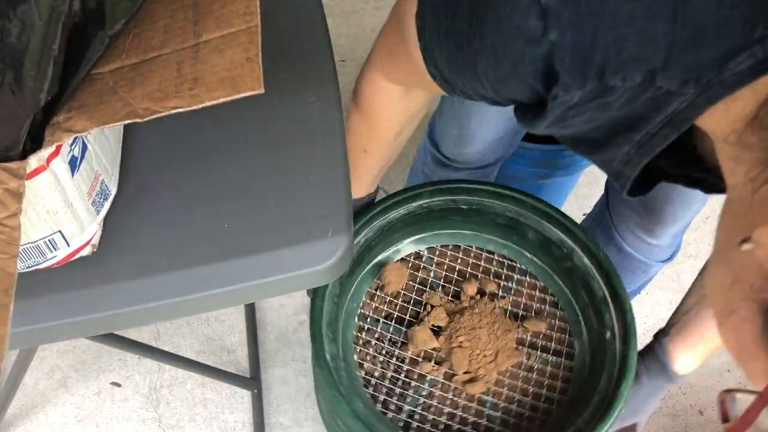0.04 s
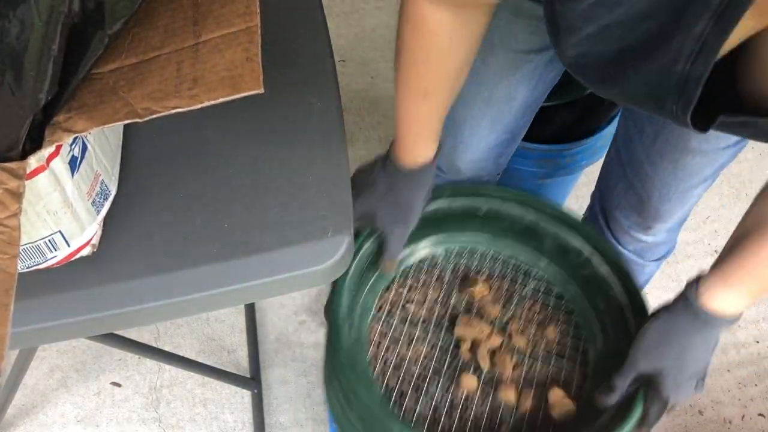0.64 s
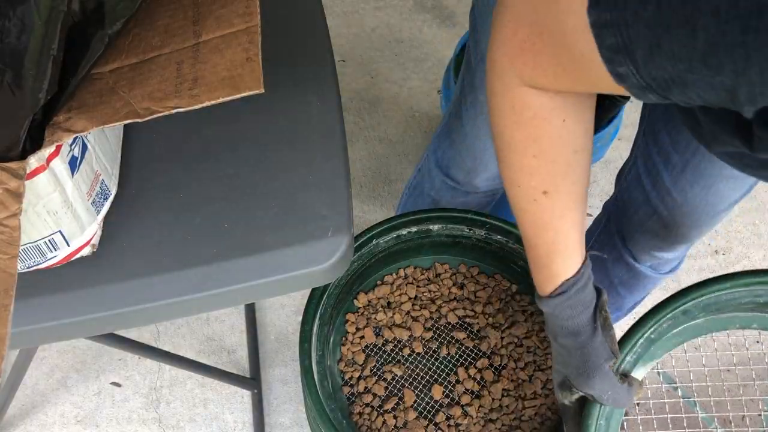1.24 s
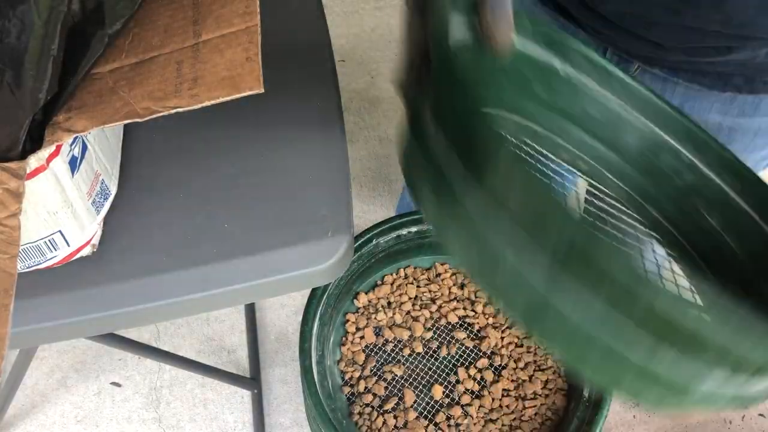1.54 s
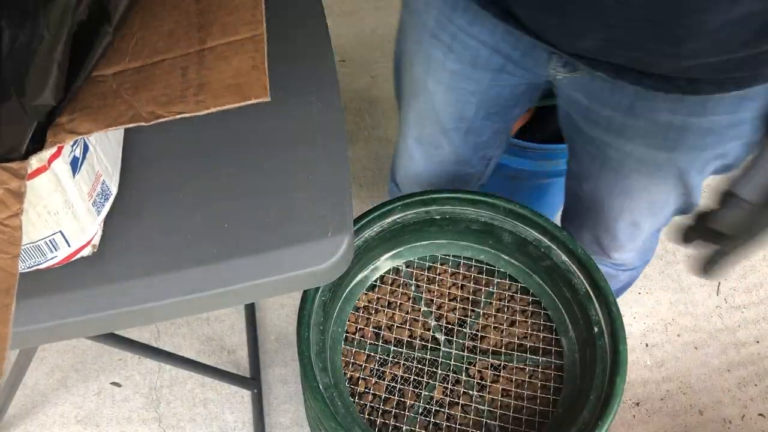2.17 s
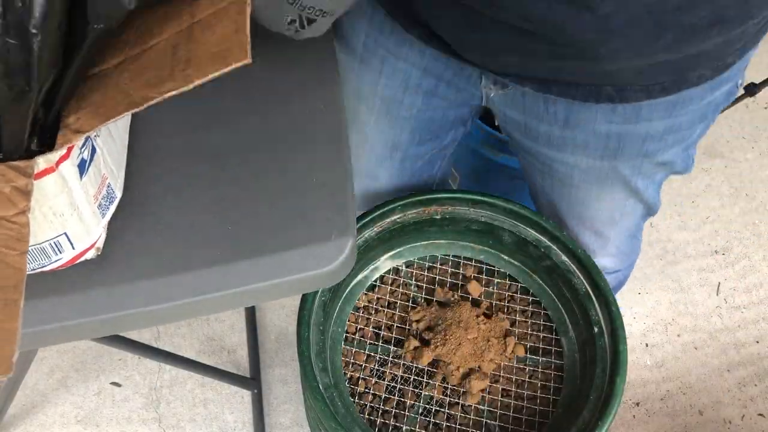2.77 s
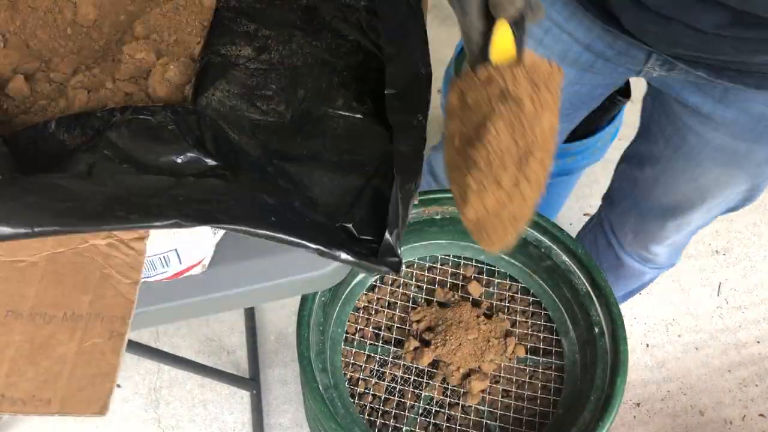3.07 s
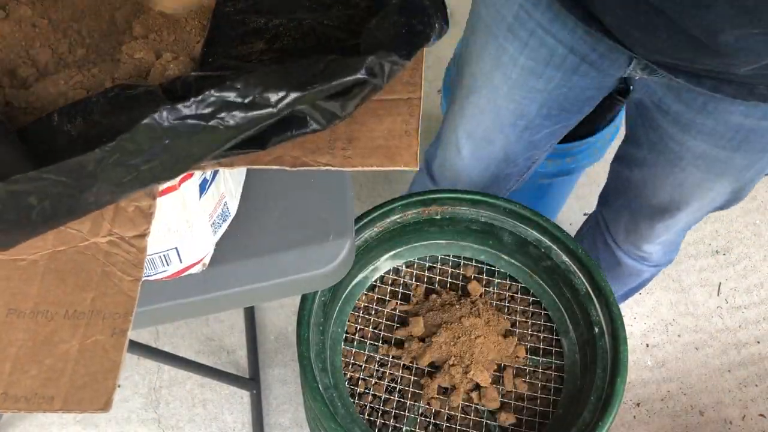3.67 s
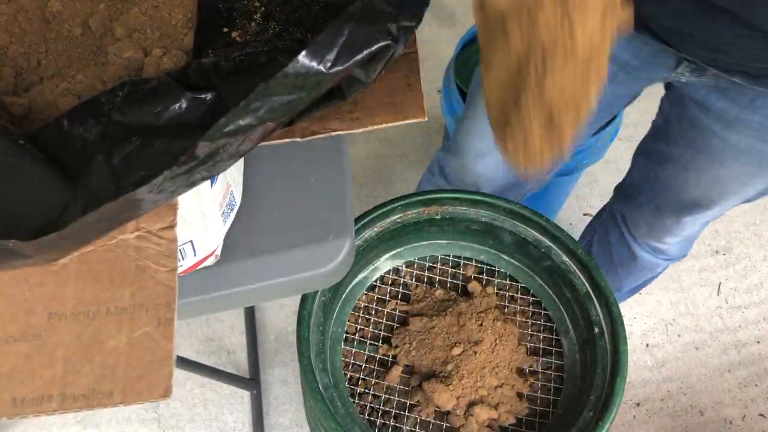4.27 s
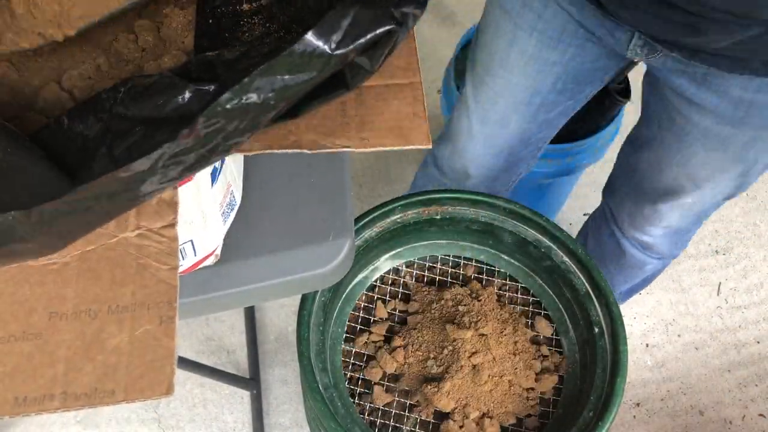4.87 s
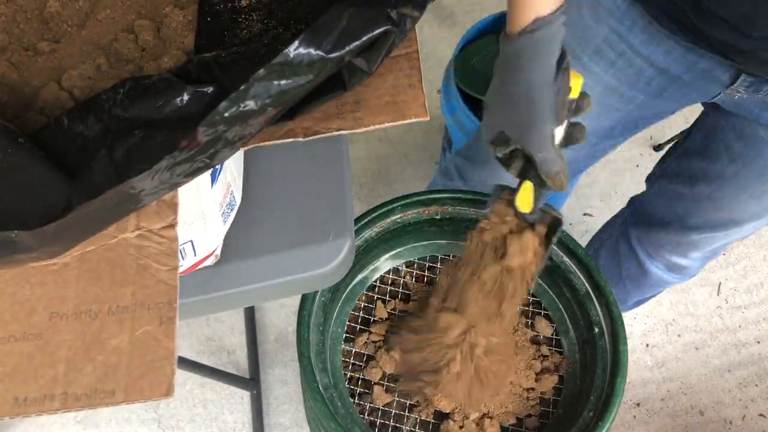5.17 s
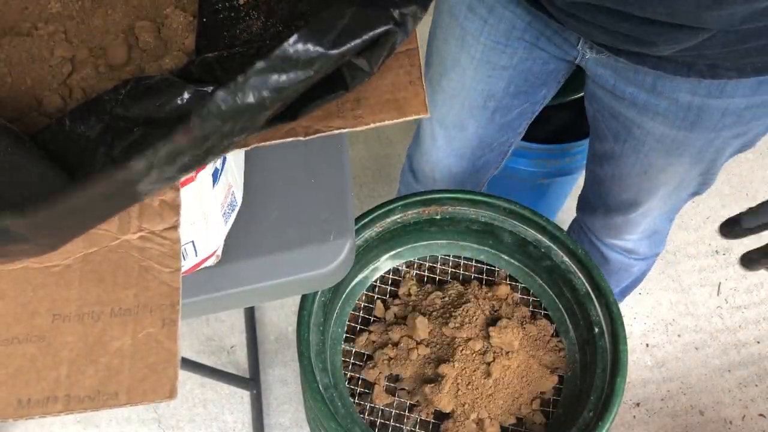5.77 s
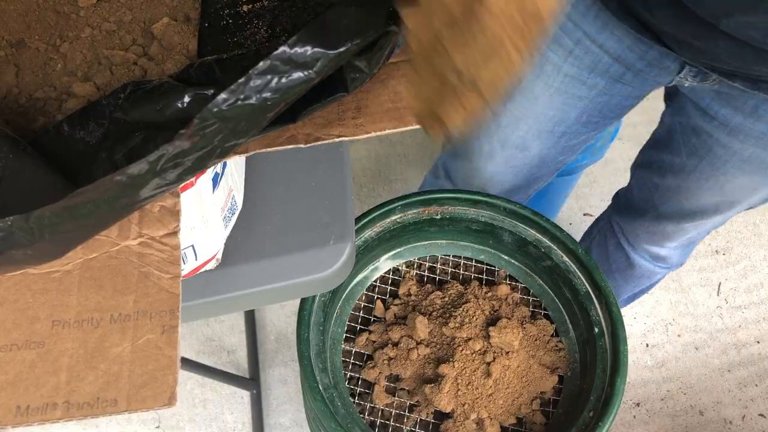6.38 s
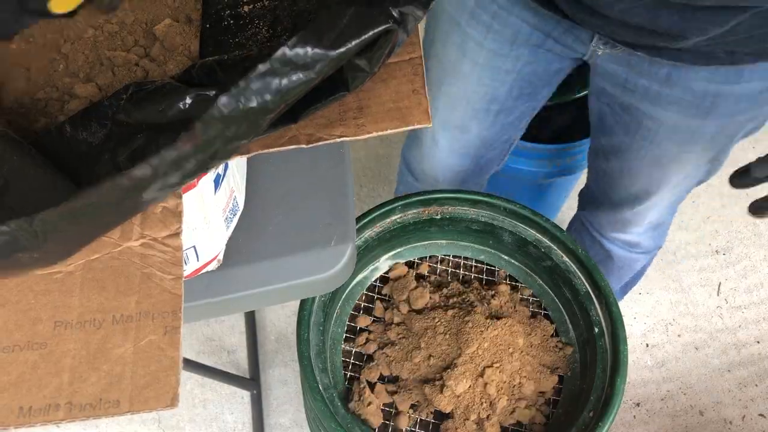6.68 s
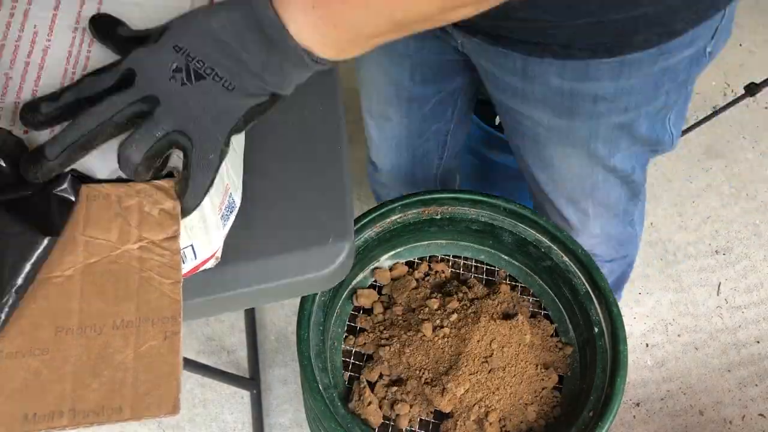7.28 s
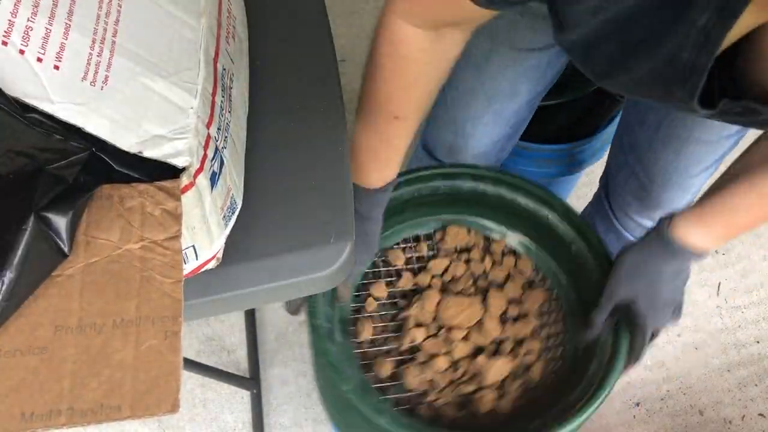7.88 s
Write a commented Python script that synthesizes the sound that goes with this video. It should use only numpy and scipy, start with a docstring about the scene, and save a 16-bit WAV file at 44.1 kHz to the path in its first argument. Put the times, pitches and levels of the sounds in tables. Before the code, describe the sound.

A few knocks on a plastic sieve lead into a short, quick burst of gravel clatter and sandy hiss. Then come scattered, softer sounds: crumbly scoops of soil, rustles of a plastic bag, brief pours and stones ticking on a trowel. Finally the sieve is shaken hard again. The microphone is just above the pan, outdoors, with a very faint machine hum behind.

```python
"""Sifting gravel in a pan

Dry gravel and dirt are shaken fast in a plastic pan with a wire-mesh floor, heard from close by.
Clods strike the wall and excite its resonances, while countless small impacts of sand on the mesh
merge into a hiss. Pans are swapped with a few knocks, dirt is scooped from a rustling plastic bag
and poured in, and the shaking starts again, over a faint hum."""
import sys
import numpy as np
from scipy import signal
from scipy.fft import rfft, irfft
from scipy.io import wavfile
from scipy.ndimage import uniform_filter1d

SR = 44100
rng = np.random.default_rng(int(sys.argv[2]) if len(sys.argv) > 2 else 0)


def to_wav(s):
    """Save 16-bit WAV."""
    ch = np.atleast_2d(s).T  # columns
    pcm = np.round(np.clip(ch, -1, 1) * 32767)  # PCM
    wavfile.write(sys.argv[1], SR, pcm.astype(np.int16))


N = 358091
TIME = np.arange(N) / SR

# Levels in the tables are relative; each source applies its own gain.
# impacts of the load on the pan wall: t/s, clatter level/dB, thud level/dB
SLAMS = [(0.2484, -52, -51.5), (0.277, -40.5, -47), (0.3221, -39.5, -42.5), (0.341, -53, -47),
         (0.3556, -31.5, -41), (0.378, -52, -39.5), (0.3938, -34, -60), (0.4149, -35, -38),
         (0.4296, -38, -43), (0.4522, -35, -39), (0.466, -29.5, -39.5), (0.489, -51, -66),
         (0.5053, -36.5, -43), (0.5312, -43, -52), (0.548, -40, -46.5), (0.614, -39, -39.5),
         (0.6238, -29.5, -41), (0.635, -38, -58), (0.655, -42, -54), (0.6657, -35, -40), (0.701, -46, -44),
         (0.7154, -37, -40.5), (0.745, -44, -47), (0.765, -40.5, -46), (7.484, -31, -47.5),
         (7.505, -32, -43.5), (7.523, -42, -46.5), (7.5449, -37.5, -51), (7.563, -31, -47),
         (7.588, -38, -47), (7.632, -31.5, -51), (7.655, -31.5, -44.5), (7.6739, -31, -58),
         (7.7197, -29, -49), (7.7426, -32.5, -42), (7.762, -44, -50), (7.787, -35.5, -40),
         (7.8055, -32, -46.5), (7.8716, -34.5, -49), (7.9406, -33.5, -55), (7.958, -38, -42.5),
         (7.9964, -31, -47), (8.044, -38, -50), (8.064, -35, -52), (8.084, -35, -44), (8.1046, -33.5, -48)]
# flow of sand through the mesh, one curve for each bout of shaking: t/s, level/dB
SAND_BOUTS = [
    [(0.285, -65), (0.305, -44), (0.55, -41.5), (0.59, -49), (0.62, -40), (0.78, -43.5), (0.845, -73)],
    [(7.46, -50), (7.485, -50.5), (7.65, -44), (7.81, -44), (7.835, -62), (7.875, -45), (7.93, -52),
     (8.0, -48.5), (8.05, -38.5), (8.12, -40.5)],
]
# knocks on the pan, whose pitch depends on grip and load: t/s, level/dB, f/Hz, T60/s
KNOCKS = [(0.0958, -38, 1365, 0.012), (0.108, -36, 1410, 0.033), (0.1258, -29, 1330, 0.02),
          (0.1356, -29, 1337, 0.032), (0.1538, -30.5, 1250, 0.0095), (0.2091, -29.5, 1220, 0.012),
          (0.2147, -29.5, 1460, 0.0022), (1.032, -32, 1653, 0.023), (1.0391, -30.5, 1693, 0.018),
          (1.063, -34.5, 1707, 0.061), (2.762, -47.5, 1490, 0.03), (2.914, -40, 1600, 0.0093),
          (3.334, -44, 1444, 0.028), (4.004, -42, 1552, 0.05), (5.7103, -31.5, 1204, 0.0073),
          (5.753, -43.5, 1520, 0.024), (6.697, -36.5, 1598, 0.037)]
# soil is shifted, dug or scooped: t/s, duration/s, crumb level/dB, grit level/dB
SCOOPS = [(0, 0.032, -39.5, -44), (0.042, 0.034, -44.5, -46), (0.1, 0.04, -46, -40.5),
          (0.2, 0.012, -30, -33.5), (0.977, 0.046, -56, -48), (1.029, 0.007, -44.5, -32),
          (1.653, 0.035, -57.5, -62), (1.837, 0.027, -51, -48), (1.891, 0.037, -49.5, -51.5),
          (1.942, 0.088, -50, -53.5), (2.529, 0.079, -51.5, -50), (2.692, 0.13, -58.5, -57),
          (2.832, 0.14, -53.5, -47.5), (3.3, 0.081, -50, -52), (3.429, 0.033, -49.5, -58),
          (3.741, 0.035, -59, -56.5), (3.959, 0.072, -45, -49), (4.582, 0.054, -48, -52.5),
          (5.387, 0.0076, -53, -53), (5.451, 0.022, -55, -53), (5.523, 0.048, -56.5, -56.5),
          (5.621, 0.025, -42.5, -53.5), (5.656, 0.014, -48, -47.5), (5.738, 0.031, -53, -52),
          (5.792, 0.071, -50, -54.5), (5.888, 0.031, -58, -51), (5.947, 0.031, -50.5, -46.5),
          (6.004, 0.094, -53.5, -53.5), (6.671, 0.052, -52.5, -50.5), (6.752, 0.011, -46, -44),
          (6.768, 0.089, -68, -60), (7.246, 0.059, -46, -49.5)]
# the bag slides or fine dirt pours: t/s, rise time/s, level/dB
SWISHES = [(0.866, 0.013, -46.5), (1.4, 0.027, -57.5), (1.543, 0.012, -63), (1.774, 0.045, -51.5),
           (2.328, 0.042, -52.5), (2.381, 0.027, -40.5), (2.416, 0.028, -47), (3.091, 0.021, -59.5),
           (3.17, 0.048, -49), (3.793, 0.075, -47.5), (4.354, 0.037, -51), (4.537, 0.044, -51),
           (5.195, 0.079, -59.5), (6.151, 0.016, -49.5), (6.477, 0.09, -52), (7.06, 0.07, -55.5)]
# single stones strike the trowel or each other: t/s, level/dB, f/Hz
CLINKS = [(0.879, -57, 3600), (2.5444, -52.5, 3060), (2.598, -48.5, 2250), (2.764, -45.5, 2170),
          (2.928, -48, 1800), (3.376, -47.5, 2350), (3.753, -52.5, 2280), (3.954, -48.5, 2400),
          (4.3826, -57.5, 4160), (5.392, -48, 2480), (5.4545, -51.5, 2380), (5.493, -53, 3630),
          (5.893, -44, 2360), (5.95, -47.5, 3400), (5.9565, -44, 2340), (6.041, -46, 1820),
          (6.56, -59, 3940), (6.699, -48, 2600), (6.745, -48, 2410)]
# bag creases snap and single grains land: t/s, level/dB
TICKS = [(0.994, -52.5), (1.059, -48), (1.0866, -46), (2.356, -52.5), (2.395, -47), (3.198, -54),
         (3.221, -49), (3.9545, -55), (4.6223, -43.5)]

# modes of the knocked pan: ratio to its pitch, level/dB
PAN_MODES = [(1, 3.5), (.86, -12), (1.17, -9), (1.62, -35), (1.92, -19)]
# resonances of the loaded pan and of the heap on the mesh: f/Hz, bandwidth/Hz, lift/dB
PAN_RESONANCES = [(1223, 510, 9.5), (1710, 150, 10), (1993, 43, 9.5), (2980, 180, 3.5), (3680, 73, 2.5)]
HEAP_RESONANCES = [(1430, 290, 6.5), (2294, 140, 7.5), (3040, 720, 5)]
# spectral envelopes: f/Hz, level/dB
CLATTER_SPECTRUM = [(130, -64.5), (450, -15.5), (800, -1.5), (1400, -2.5), (2100, -1), (3200, -1.5),
                    (9000, -13), (16000, -26)]  # clods on the wall
THUD_SPECTRUM = [(60, -51.5), (200, -32), (290, -21.5), (400, 2), (600, 11), (850, 10.5), (1400, -18)]  # the weight of the load
SAND_SPECTRUM = [(100, -74), (250, -26), (420, 6.5), (800, 5), (4500, 2), (8000, 5.5), (12000, 7),
                 (16000, 2.5)]  # sand on the wires
CRUMB_SPECTRUM = [(50, -70), (280, -28), (450, -15), (1100, -8.5), (1600, -1.5), (4000, -5.5),
                  (6000, -18.5), (12000, -18.5)]  # coarse soil
CRACKLE_SPECTRUM = [(100, -55.5), (500, -34), (2000, -25), (3600, -1), (6500, 2), (12000, 2), (16000, -4)]  # grit and bag film
DUST_SPECTRUM = [(400, -47), (3500, -7.5), (7000, -5.5), (12000, 0.5), (16000, -3)]  # the finest grains
AIR_SPECTRUM = [(50, -65.5), (270, -28), (370, -12.5), (950, -7), (1900, -12), (6200, -27), (16000, -40.5)]  # outdoor air
# partials of a machine hum: f/Hz, level/dB
HUM_PARTIALS = [(455, -84.5), (910, -79.5), (1916, -79.5), (4740, -89)]
# far tones that swell and fade: peak t/s, Gaussian width/s, f/Hz, glide/(Hz/s), level/dB, flutter/Hz
FAR_TONES = [(2.08, 0.13, 1183, 699.5, -66, 45), (4.093, 0.13, 921, 0.5, -67, 5.5),
             (4.166, .3, 572, -0.5, -74, 3.4)]


def clod_slams(land_s=0.0043, tumble_db=-15, tumble_s=0.02, clack_s=0.0015, thud_lag_s=0.0023,
               thud_s=0.0023, clatter_db=-1.27, clack_db=-9, thud_db=1.5, clod_lift_db=7, size=2048):
    """Impact excitation: the biggest clod clacks, the rest land and tumble, and the load's mass thuds."""
    out, t = np.zeros(N), TIME[:size]
    body = response(THUD_SPECTRUM)
    landing = np.maximum(np.exp(-t / land_s), undb(tumble_db) * np.exp(-t / tumble_s))
    for start, high_db, low_db in SLAMS:
        # the load lies differently each time and shifts the resonances; the biggest clod adds its own
        peaks = [(hz * np.exp(0.072 * rng.standard_normal()), width, lift)
                 for hz, width, lift in PAN_RESONANCES]
        clod_hz = rng.uniform(840, 3050)
        wall = response(CLATTER_SPECTRUM, peaks + [(clod_hz, clod_hz / 4, clod_lift_db)])
        clods = impulses(rate=12000, spread_db=2, size=size) * landing
        clack = noise_burst(clack_s, size)
        load = impulses(rate=5400, spread_db=-4.5, size=size) * np.exp(-t / thud_s)
        add(out, start, at_level(through(clods, wall), high_db + clatter_db))
        add(out, start, at_level(through(clack, wall), high_db + clack_db))
        add(out, start + thud_lag_s, at_level(through(load, body), low_db + thud_db))
    return out


def sand_hiss(surge_depth=2.1, surge_s=0.002, gain_db=4.5):
    """Shot noise: dense grains strike the wires, and their flow surges as the load slides at each slam."""
    flow = np.zeros(N)
    for bout in SAND_BOUTS:
        times, levels = np.transpose(bout)
        flow += undb(np.interp(TIME, times, levels)) * (TIME >= times[0]) * (TIME <= times[-1])
    jolts, t = np.ones(N), TIME[:SR // 20]
    surge = surge_depth * np.exp(-abs(t - t.mean()) / surge_s)
    for start, _, _ in SLAMS:
        add(jolts, start - t.mean(), surge)
    jolts /= running_rms(jolts, size=3000)
    stream = ringing_grains(rate=36000, spread_db=2.5, drive=flow * jolts, ring_q=15, patchy_db=3)
    return undb(gain_db) * through(stream, response(SAND_SPECTRUM, PAN_RESONANCES))


def pan_knocks(tick_db=-14, contact_s=0.0061, contact_share=0.11, chatter_gain=0.33, size=8192):
    """Damped modes: a chattering contact rings the pan; a firm grip shortens both contact and ring."""
    out, t = np.zeros(N), TIME[:size]
    wall = response(CRUMB_SPECTRUM, PAN_RESONANCES)
    highpass = signal.butter(4, 550, "high", fs=SR, output="sos")
    for start, db, hz, t60 in KNOCKS:
        pressure = np.exp(-t / (contact_s + contact_share * t60))
        modes = sum(undb(mode_db) * np.sin(2 * np.pi * hz * ratio * t) for ratio, mode_db in PAN_MODES)
        modes *= np.exp(-np.log(1000) * t / t60)
        contact = impulses(rate=5100, spread_db=7.5, size=size) * pressure
        # the ring builds up while the contact lasts, and the chatter roughens it
        build_up = unit(modes * (1 - pressure))
        chatter = unit(through(contact, np.gradient(modes)))
        ring = signal.sosfilt(highpass, build_up + chatter_gain * chatter)
        add(out, start, at_level(ring, db) + at_level(through(contact, wall), db + tick_db))
    return out


def soil_and_bag_rustle(crackle_db=-2, film_db=-6, catch_db=3, catch_rate=110):
    """Stick-slip friction: crumbs tumble in clumps, grit and bag film crackle, and fine dust hisses."""
    clumps = undb(catch_db * wander(catch_rate))
    clumps /= running_rms(clumps, size=1000)
    coarse, fine, sliding = soil_motion() * clumps
    crumbs = ringing_grains(rate=5000, spread_db=3, drive=coarse, ring_q=20.4, patchy_db=3.5)
    grit = ringing_grains(rate=7000, spread_db=3.5, drive=fine, ring_q=19, patchy_db=2.5)
    film = undb(film_db) * impulses(rate=3400, spread_db=1) * fine
    dust = ringing_grains(rate=12000, spread_db=4, drive=sliding, ring_q=15)
    return (through(crumbs, response(CRUMB_SPECTRUM, HEAP_RESONANCES))
            + undb(crackle_db) * through(grit + film, response(CRACKLE_SPECTRUM))
            + through(dust, response(DUST_SPECTRUM)))


def soil_motion(attack_share=0.26, release_share=0.3, stop_s=0.0033, settle_db=-13, settle_s=0.038,
                swell_power=0.94, swish_fade_s=0.014, swish_crumb_db=-19):
    """Incoherent addition: scoops and swishes sum in power to the envelopes of crumbs, grit and dust."""
    coarse, fine, sliding = np.zeros((3, N))
    t = TIME[:SR // 2]
    for start, length, crumb_db, grit_db in SCOOPS:
        # long moves start and stop gently, short ones abruptly; loose grains trickle on
        after = np.maximum(t - length, 0)
        attack = np.minimum(t / (attack_share * length), 1)
        release = np.exp(-after / (stop_s + release_share * length))
        trickle = undb(settle_db) * np.exp(-after / settle_s)
        scoop = attack * np.maximum(release, trickle)
        add(coarse, start, (scoop * undb(crumb_db)) ** 2)
        add(fine, start, (scoop * undb(grit_db)) ** 2)
    for start, rise_s, db in SWISHES:
        swell = np.minimum(t / rise_s, 1) ** swell_power
        swish = swell * np.exp(-np.maximum(t - rise_s, 0) / swish_fade_s)
        add(coarse, start, (swish * undb(db + swish_crumb_db)) ** 2)
        add(sliding, start, (swish * undb(db)) ** 2)
    return np.sqrt([coarse, fine, sliding])


def stone_clinks(ring_db=17, ring_q=7, tick_s=0.0029, size=2048):
    """Resonant filtering: a stone's one damped resonance colours the hard, dry tick of its impact."""
    out = np.zeros(N)
    for start, db, hz in CLINKS:
        stone = response(CRUMB_SPECTRUM, [(hz, hz / ring_q, ring_db)])
        add(out, start, at_level(through(noise_burst(tick_s, size), stone), db))
    return out


def crease_and_grain_ticks(tick_s=0.00094, pitch_hz=6000, ring_db=10, size=2048):
    """A short pulse has a wide spectrum: a crease or lone grain cracks brightly, with its own ring."""
    out = np.zeros(N)
    for start, db in TICKS:
        hz = pitch_hz * 2 ** rng.uniform(-0.91, 1)
        colour = response(CRACKLE_SPECTRUM, [(hz, hz / 10, ring_db)])
        add(out, start, at_level(through(noise_burst(tick_s, size), colour), db))
    return out


def background(air_db=-69, stray_db=-82, patchy_db=7, waver_db=1.5, hum_flutter_hz=6):
    """Random modulation: outdoor air, machine hum and far tones waver; stray grains fall in patches."""
    out = through(rng.standard_normal(N), response(AIR_SPECTRUM)) * undb(air_db + wander(rate=7.2) / 2)
    tones = [(hz, undb(db), hum_flutter_hz) for hz, db in HUM_PARTIALS]
    for peak_s, width_s, hz, glide, db, flutter_hz in FAR_TONES:
        swell = np.exp(-((TIME - peak_s) / width_s) ** 2 / 2)
        tones.append((hz + glide * (TIME - peak_s), undb(db) * swell, flutter_hz))
    for hz, gain, flutter_hz in tones:
        waver = unit(undb(waver_db * wander(rate=32)))
        phase = 2 * np.pi * np.cumsum(hz + flutter_hz * wander(rate=120)) / SR
        out += gain * waver * np.sqrt(2) * np.sin(phase)
    strays = impulses(rate=1800, spread_db=5) * unit(undb(patchy_db * wander(rate=16)))
    return out + undb(stray_db) * through(strays, response(DUST_SPECTRUM))


def ringing_grains(rate, spread_db, drive, ring_q, patchy_db=0, patchy_rate=35, sizes=30):
    """Constant-Q resonators: each size of grain rings briefly at its own pitch, and comes and goes."""
    out = 0
    for hz in np.geomspace(500, 15500, sizes):
        presence = unit(undb(patchy_db * wander(patchy_rate)))
        hits = impulses(rate / sizes, spread_db) * drive * presence
        out = out + signal.lfilter(*signal.iirpeak(hz, ring_q, fs=SR), hits)
    return out * np.sqrt(2 * ring_q / sizes)


def impulses(rate, spread_db, size=N):
    """A random point process: rate contacts a second, with power-law strengths and unit rms."""
    out, count = np.zeros(size), int(rate * size / SR) + 1
    place, chance, polarity = rng.random((count, 3)).T
    strength = undb(-spread_db * np.log(chance + 0.003))
    out[(place * size).astype(int)] = np.sign(polarity - 0.5) * strength
    return unit(out)


def noise_burst(decay_s, size):
    """Broadband excitation: white noise under an exponential decay."""
    return rng.standard_normal(size) * np.exp(-TIME[:size] / decay_s)


def wander(rate):
    """Linear interpolation of rate random values a second gives a drift with a spread near 1."""
    knots = rng.standard_normal(int(N / SR * rate) + 2)
    return np.interp(TIME * rate, np.arange(len(knots)), knots) * np.sqrt(3 / 2)


def response(spectrum, resonances=(), size=2048):
    """Minimum-phase impulse response of unit energy, from a spectral envelope and its resonances."""
    f = np.arange(size // 2 + 1) * SR / size
    hz, db = np.transpose(spectrum)
    shape_db = np.interp(np.log(f + 1), np.log(hz), db)
    for centre, width, lift in resonances:
        shape_db += lift / (1 + (2 * (f - centre) / width) ** 2)
    cepstrum = irfft(np.log(undb(shape_db)))
    cepstrum[1:size // 2] *= 2  # folding the cepstrum makes the response causal
    cepstrum[size // 2 + 1:] = 0
    h = irfft(np.exp(rfft(cepstrum)))
    return h / np.linalg.norm(h)


def through(x, h):
    """Convolution of x with the impulse response h, cut to the length of x."""
    return signal.fftconvolve(x, h)[:len(x)]


def at_level(sound, db):
    """Equal energy: scale a transient to match 10 ms of steady sound at this level."""
    return sound * undb(db) * np.sqrt(SR / 100 / np.sum(sound ** 2))


def add(track, start, sound):
    """Superpose a sound on the track from start, in seconds."""
    i = max(int(start * SR), 0)
    track[i:i + len(sound)] += sound[:max(N - i, 0)]


def running_rms(x, size):
    """Effective amplitude over a sliding window of size samples."""
    return np.sqrt(uniform_filter1d(x ** 2, size=size))


def unit(x):
    """Normalisation to unit rms."""
    return x / np.sqrt(np.mean(x ** 2))


def undb(db):
    """Amplitude ratio of a level in decibels."""
    return 10 ** (np.asarray(db) / 20)


def scene():
    """Linear superposition of all sources, heard in one channel just above the pan."""
    return (clod_slams() + sand_hiss() + pan_knocks() + stone_clinks() + crease_and_grain_ticks()
            + soil_and_bag_rustle() + background())[None]


def record(dry, echo_db=-21, echo_t60=0.2, echo_delay_s=0.006, cutoff_hz=16200):
    """Reverberation: nearby walls and paving reflect a short, dull tail; a low-pass limits the band."""
    t = TIME[:SR // 2]
    decay = np.exp(-np.log(1000) * t / echo_t60) * (t > echo_delay_s)
    tail = through(rng.standard_normal(len(t)), response(CLATTER_SPECTRUM)) * decay
    wet = dry + undb(echo_db) * through(dry[0], tail / np.linalg.norm(tail))
    return signal.sosfilt(signal.ellip(10, 0.2, 70, cutoff_hz, fs=SR, output="sos"), wet)


dry = scene()
out = record(dry)
to_wav(out)
```